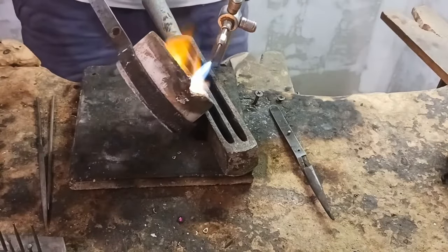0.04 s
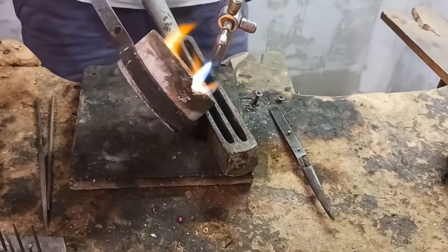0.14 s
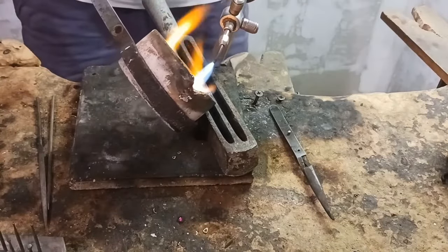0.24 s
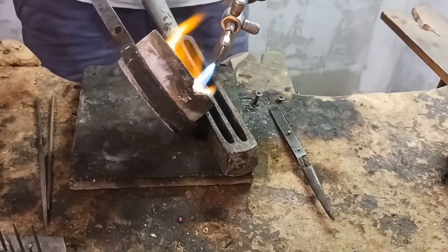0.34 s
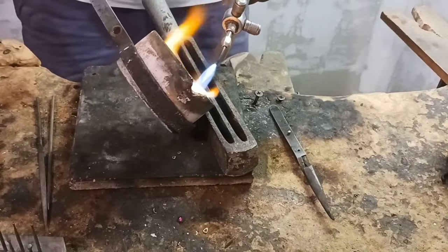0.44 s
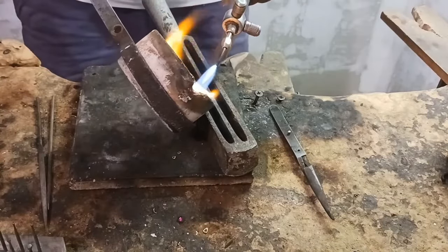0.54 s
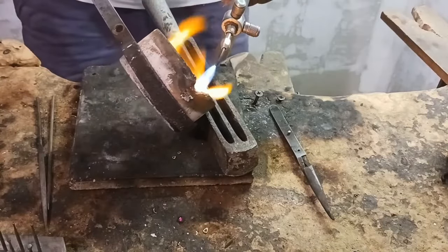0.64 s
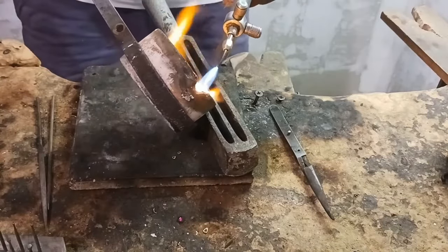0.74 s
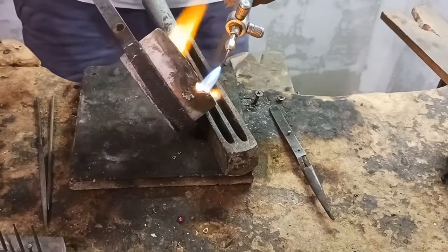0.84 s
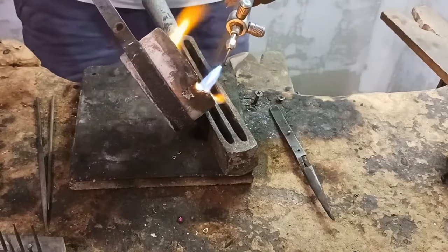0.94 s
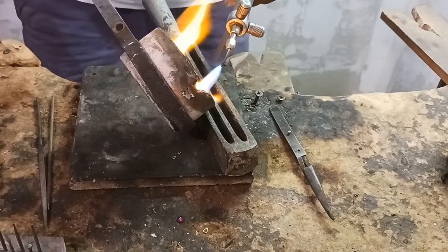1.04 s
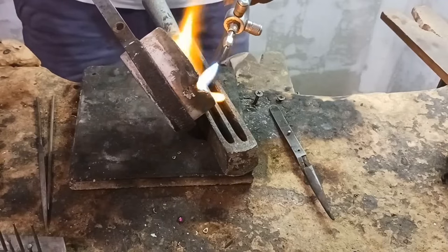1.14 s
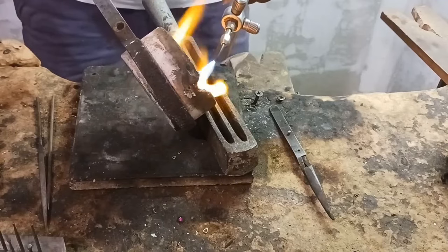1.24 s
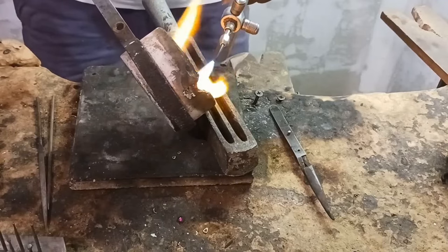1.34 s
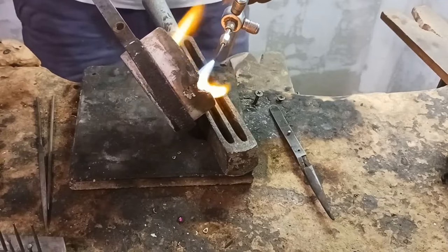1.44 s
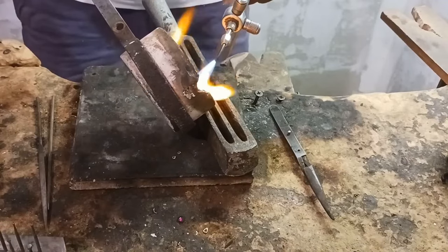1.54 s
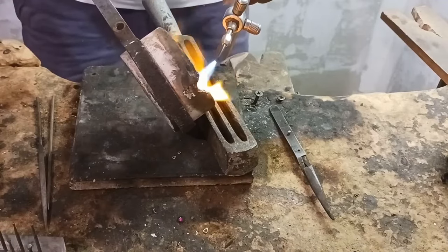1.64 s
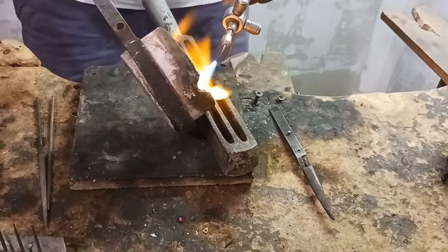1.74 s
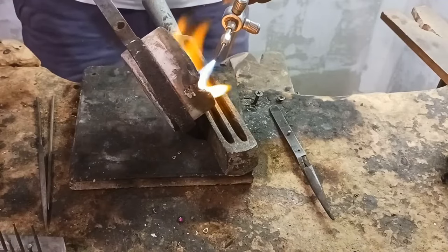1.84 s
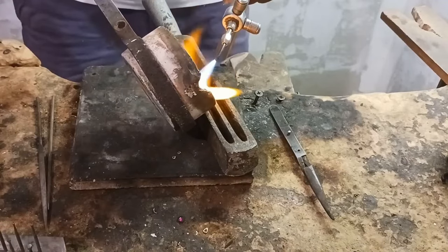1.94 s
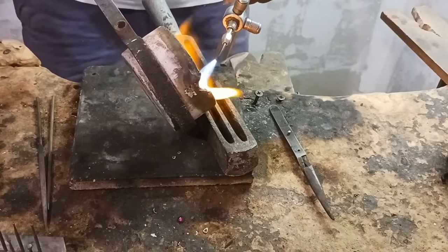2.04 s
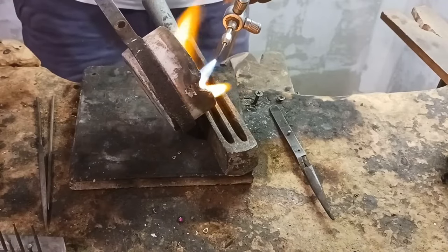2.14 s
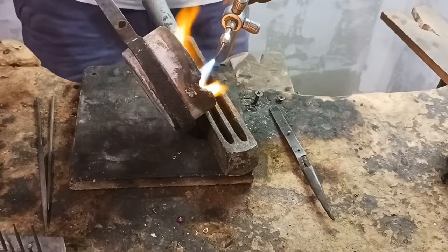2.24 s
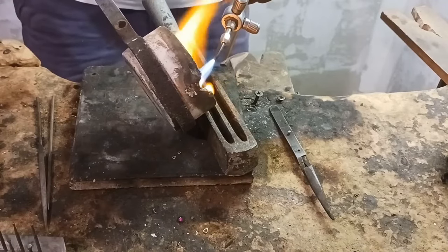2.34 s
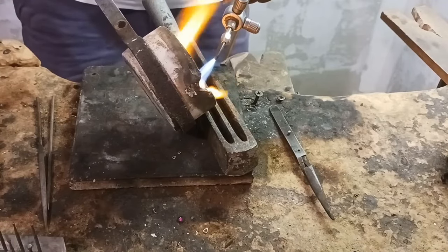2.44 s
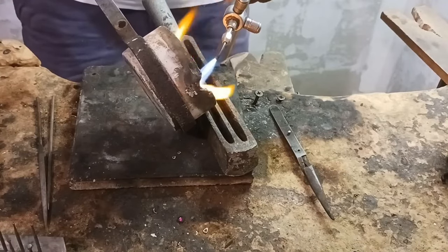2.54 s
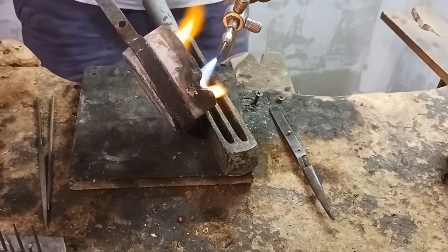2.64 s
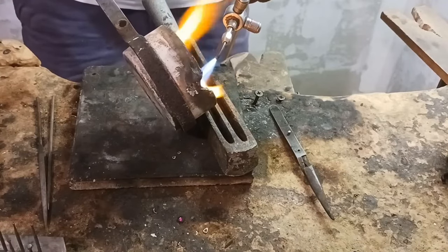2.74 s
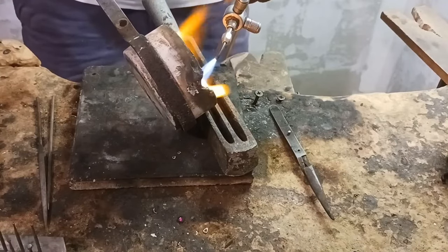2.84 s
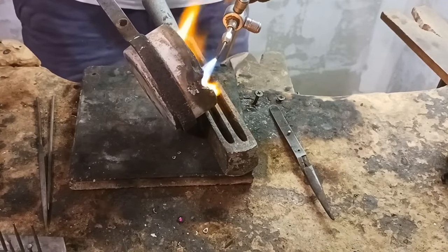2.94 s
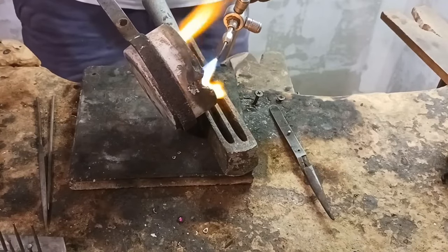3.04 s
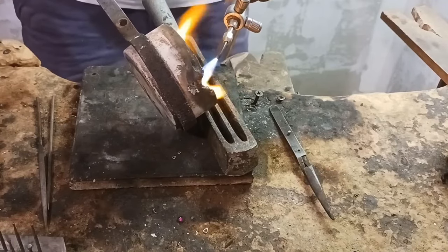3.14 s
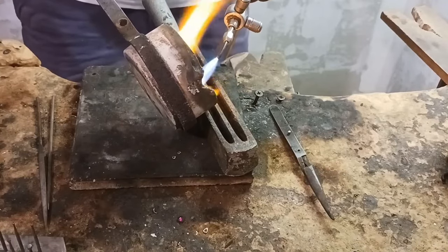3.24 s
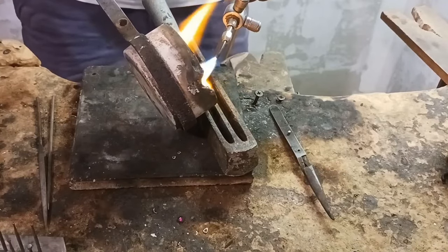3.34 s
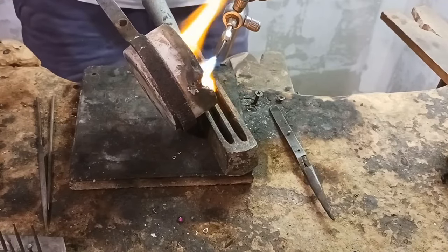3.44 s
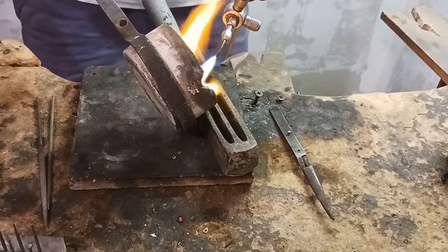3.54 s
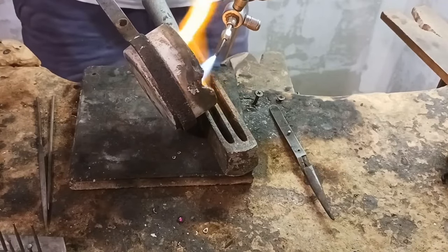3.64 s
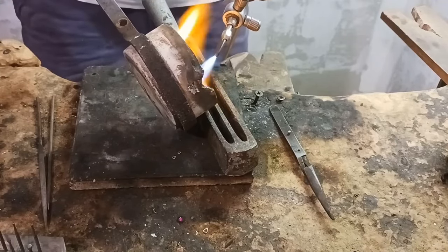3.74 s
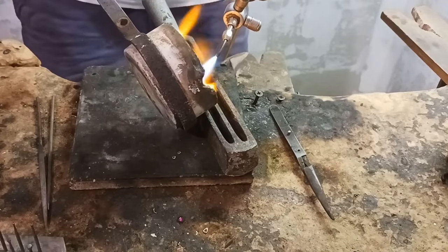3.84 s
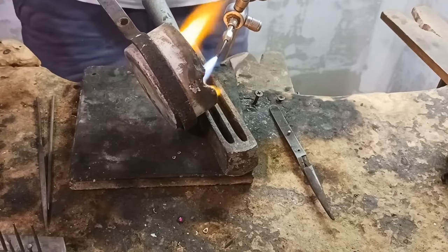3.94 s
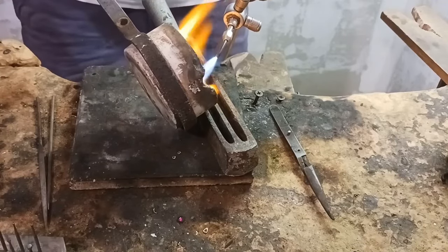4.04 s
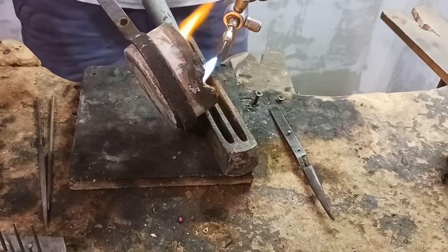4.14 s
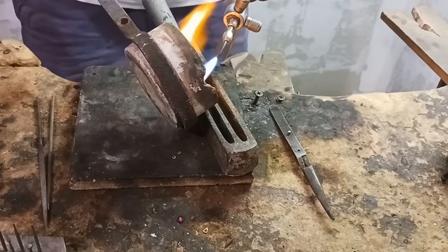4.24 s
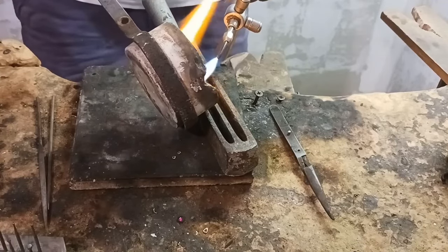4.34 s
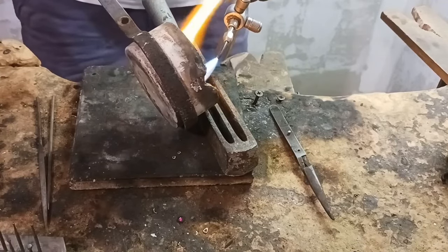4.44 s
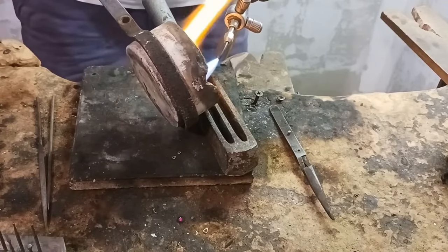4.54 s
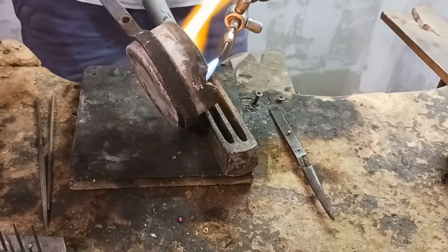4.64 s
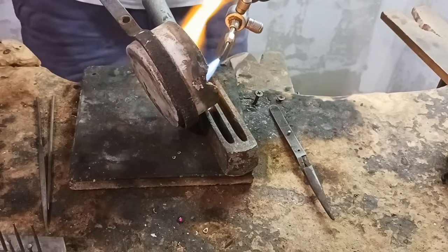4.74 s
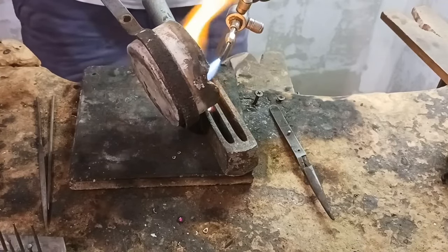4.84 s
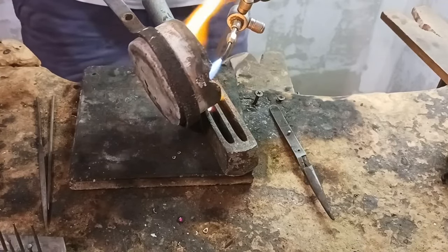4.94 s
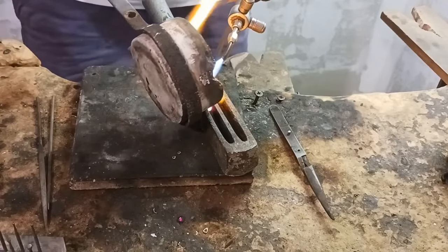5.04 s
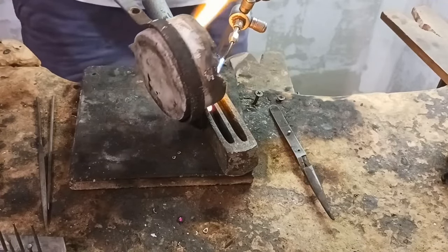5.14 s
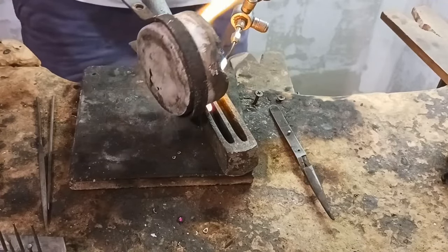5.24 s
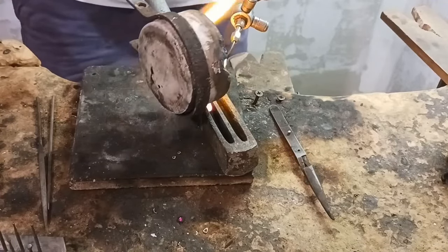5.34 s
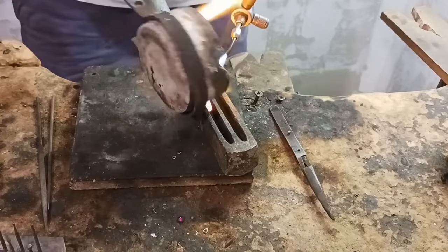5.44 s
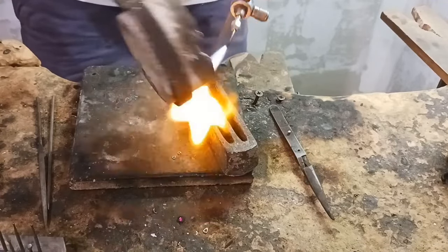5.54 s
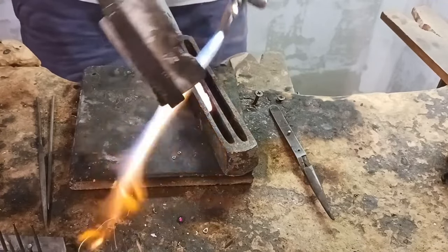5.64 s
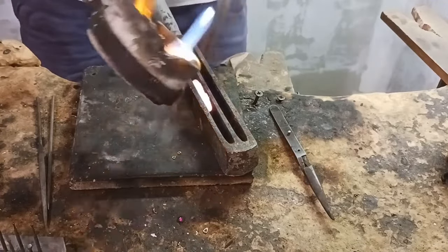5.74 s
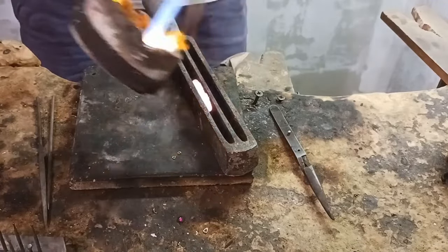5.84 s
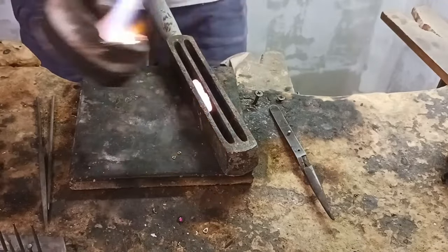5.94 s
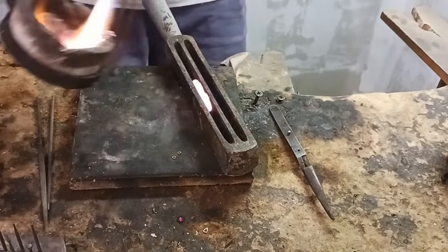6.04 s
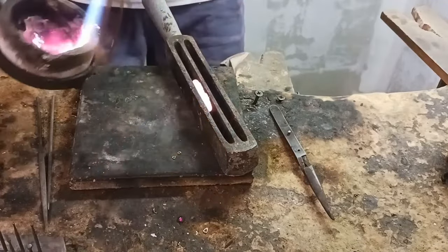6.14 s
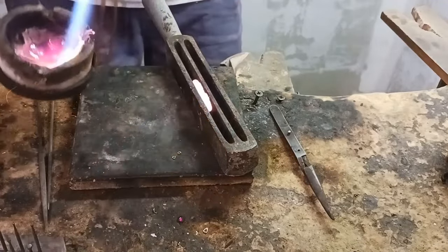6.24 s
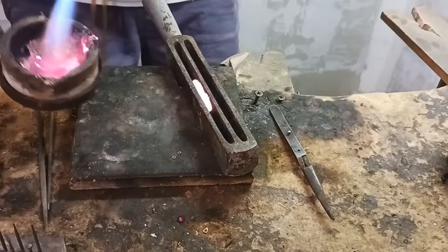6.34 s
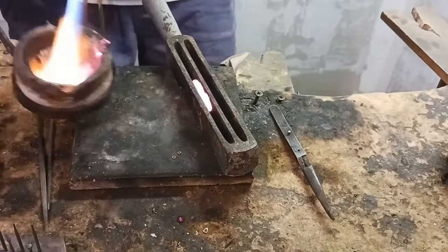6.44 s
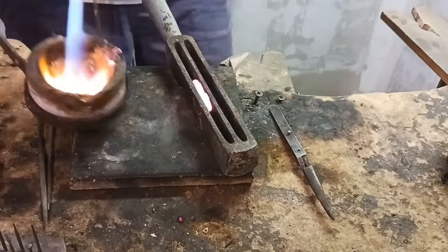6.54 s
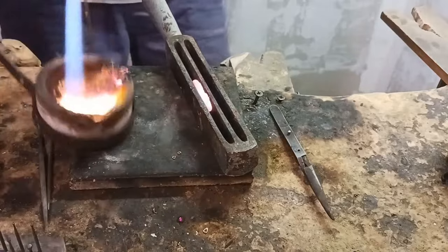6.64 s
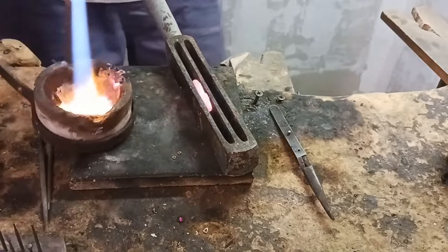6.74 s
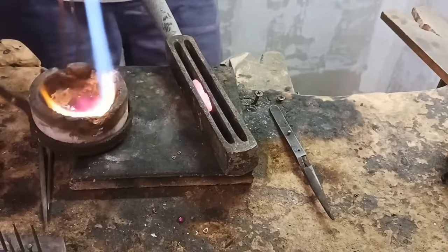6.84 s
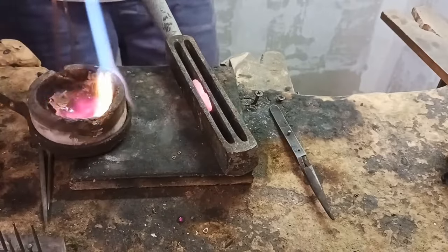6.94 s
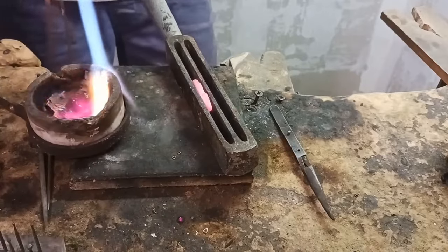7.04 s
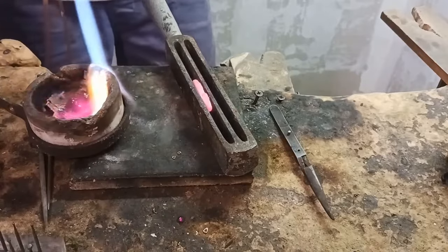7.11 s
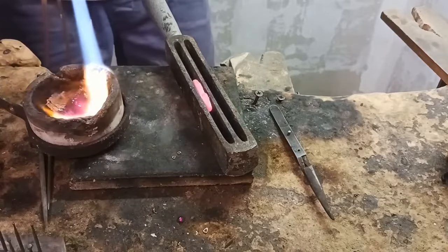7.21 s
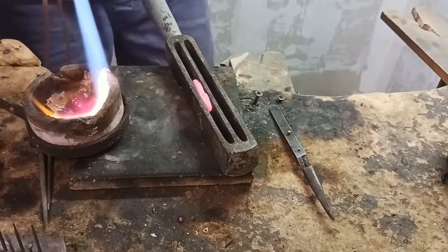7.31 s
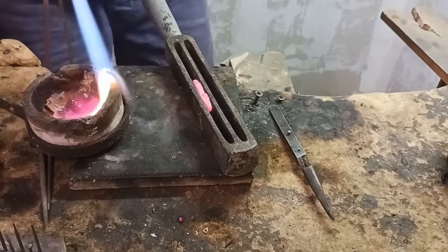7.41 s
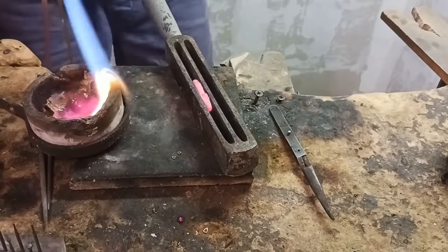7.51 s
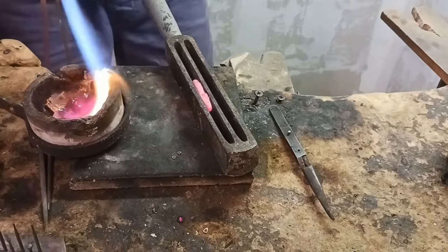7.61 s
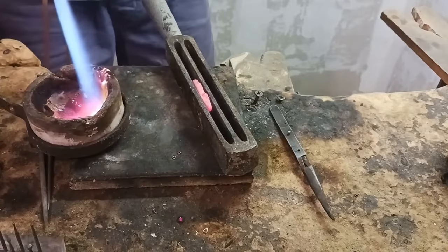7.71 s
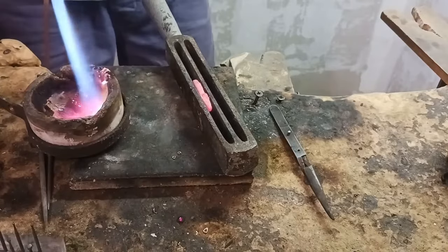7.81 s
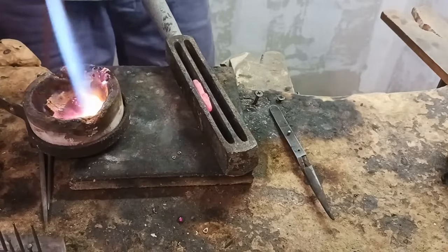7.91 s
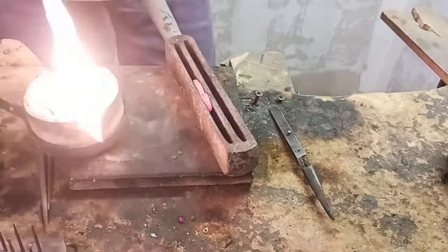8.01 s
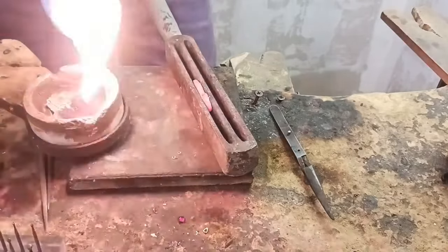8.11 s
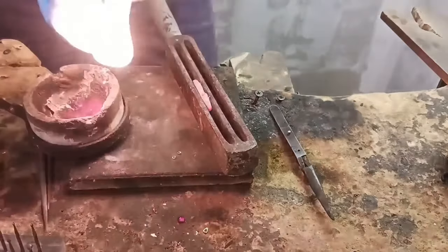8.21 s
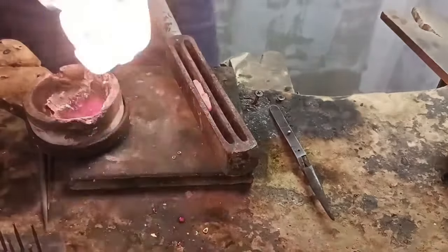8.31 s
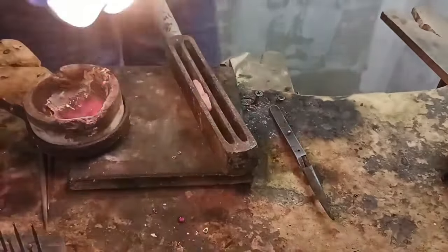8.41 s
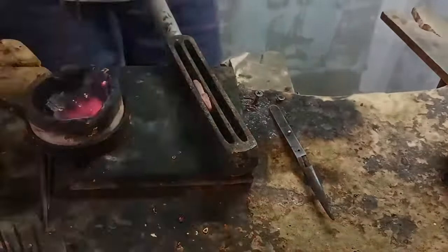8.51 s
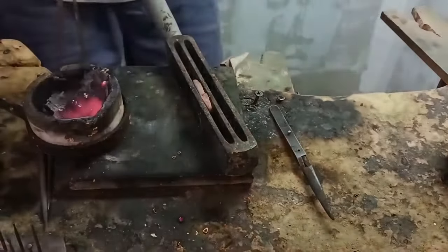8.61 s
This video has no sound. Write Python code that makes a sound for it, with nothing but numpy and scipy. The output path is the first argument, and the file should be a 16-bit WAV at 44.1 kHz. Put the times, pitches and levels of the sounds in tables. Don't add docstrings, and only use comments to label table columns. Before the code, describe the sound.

Close-up stereo sound of a turbulent torch jet, a dense hiss over a breathy roar with raspy, fizzing edges, heard from the start. It shifts in strength and colour with the hollow crucible. After a few faint bumps comes a solid clunk as the crucible is put on the bench, with a small settling knock. The jet soon stops sharply, with a short room tail, weak flame puffs and quiet hum.

```python
import sys
import numpy as np
from scipy import signal
from scipy.fft import rfft, irfft, next_fast_len
from scipy.io import wavfile
from scipy.ndimage import uniform_filter1d, map_coordinates

SR = 44100
rng = np.random.default_rng(int(sys.argv[2]) if len(sys.argv) > 2 else 0)


def amplitude_ratio(level_db):
    exponent = np.asarray(level_db, float) / 20
    return 10 ** exponent


def transcribe(u):
    v = np.clip(np.atleast_2d(u).T, -1, 1)
    q = np.round(v * 32767).astype(np.int16)
    wavfile.write(sys.argv[1], SR, q)


N = 382331

# (time [s], level [dB])
DEPTH = [(0, -0.5), (.7, -0.5), (1.6, 0), (2.4, 0.5), (2.75, 3.5), (3.3, 2.5), (3.9, 1.5), (4.3, -1),
         (4.8, 0.5), (5.3, -1), (5.65, -2.5), (5.8, -2), (6.2, -0.5), (6.8, 2.5), (7.3, -.5), (8.1, 0)]
HANDLED_S = (5.35, 8.5, .35)


def torch(mould, bench):
    # (frequency [Hz], density [dB per Hz])
    hiss = [(560, -39.5), (950, -16), (1350, -6.5), (1470, -8), (1740, -4), (1950, -4.5), (2120, -4),
            (2540, -2), (3500, -4.5), (4550, -51), (7700, -120)]
    roar = [(190, -37), (330, -14.5), (394, -17), (453, -3), (589, -4.5), (658, -1.5), (855, -2.5),
            (1100, -4), (1430, -10.5), (2420, -120)]
    rasp = [(1880, -32), (3200, -8), (3360, -25), (3500, -3.5), (3950, -1.5), (5380, -6.5), (6400, -11.5),
            (8320, -24), (14100, -120)]
    fizz = [(3500, -35.5), (6000, -5), (8750, 0.5), (9800, -2.5), (12700, -2), (14700, -4.5), (15300, -8),
            (15800, -9)]
    # (start [s], end [s], start over free jet [dB], end over free jet [dB], bite [dB])
    strikes = [(-.1, 0.836, 6, 6.2, 0.2), (0.83, 1.328, 4.5, 5.1, 1), (1.892, 2.46, 0.5, 1, -1.5),
               (2.46, 3.328, 2.5, 1.1, -0.4), (3.335, 3.457, 5, 1.5, 0), (3.56, 3.913, 6, 5.5, -1),
               (3.929, 4.24, 7, 5.8, -0.5), (4.426, 4.655, 6, 5.9, 0.5), (5.689, 5.788, 5, 9.2, 3.5),
               (5.788, 5.995, 9.5, 8.1, 1.5), (6, 6.116, 8.5, 8.7, -0.5), (6.118, 6.44, 9, 7.6, 1.6),
               (6.44, 6.71, 8.5, 4.2, 0), (6.705, 7.1, 8.5, 8.8, 0.8), (7.102, 7.525, 9, 2.8, 1),
               (7.804, 8.092, 7.5, 3, 0.6)]
    bite_shares = [-0.03, 0.18, 0.98, -0.011]
    # (time [s], left minus right [dB])
    swing = [(0.0, 5.5), (0.25, 6.5), (3.4, 8.5), (3.42, 7), (5.82, 7.5), (5.92, 2.5), (6.13, 6), (6.94, 5),
             (7.12, 0.5), (7.47, 5.5), (7.84, 3.5), (8.0, 5), (8.3, 4)]
    # (free level [dB], strike share [ratio], depth share [ratio], carried change [dB], air-cut change [dB])
    follows = [
        (-29.5, 0.53, 0.49, -1, -12.5),
        (-43.5, .1, 0.93, -1.6, -4.5),
        (-31, 0.87, 0.11, .5, -11.5),
        (-30, 0.98, 0.12, -1.5, -13),
    ]
    # (centred left minus right [dB], swing share [ratio], carried change [dB])
    leans = [
        (0.6, 0.47, -2),
        (-1.5, 0.06, -0.5),
        (-2, 0.73, -0.7),
        (1.1, 1.32, -2),
    ]
    # (frequency [Hz], width [Hz], level [dB])
    tilted = [(698, 116, 3), (1238, 55, 5), (1474, 115, 5.5), (1830, 28, 4.5), (1940, 23, 4.5),
              (1977, 27, 6.5), (2200, 80, 2.5), (2588, 183, 5), (2930, 120, 5), (3550, 71, 4),
              (3862, 72, 5.5), (4310, 60, 3.5), (4690, 94, 5)]
    # (frequency [Hz], width [Hz], level [dB])
    upright = [(733, 110, 2.3), (1254, 52, 5.1), (2050, 68, 3.1), (2690, 500, 0.71), (3700, 94, 2.5),
               (4240, 43, 2)]
    # (frequency [Hz], level [dB])
    shade = [(300, -4), (800, 1), (940, -4), (1150, -0.5), (1450, -4), (1580, 0), (3000, -1), (4200, -1),
             (5500, -0.7), (7000, 1)]
    edge_s = 0.013
    carry_start_s, carry_end_s = 5.44, 6.35
    air_cut_s, air_cut_length_s = 8.0, 0.03

    strike_db, bite_db = np.zeros((2, N))
    for start_s, end_s, first_db, last_db, edge_bite_db in strikes:
        hit = span(start_s, end_s, edge_s)
        strike_db += hit * slide(start_s, end_s, first_db, last_db)
        bite_db += hit * edge_bite_db
    depth_db, swing_db = curves(DEPTH)[0], curves(swing)[0]
    cut = slide(air_cut_s, air_cut_s + air_cut_length_s, 0, 1)
    turn_rad = np.pi / 2 * slide(carry_start_s, carry_end_s, 0, 1)
    aside = np.sin(turn_rad) ** 2
    surge = wobble(9)

    # colour, trim [dB], patches [dB], surge [dB], wash [dB], wash t60 [s]
    parts = [(hiss, -3.6, 1.3, .4, -3, .45), (roar, -1.2, 1.6, .3, -3, .45),
             (rasp, -7, 1.1, .6, 1.5, .4), (fizz, -9, 1.3, .7, 5, .35)]
    direct, total = np.zeros((2, 2, N))
    for part, follow, lean, sharp in zip(parts, follows, leans, bite_shares):
        colour, trim_db, patchy_db, surge_db, wash_db, t60_s = part
        free_db, strike_share, depth_share, moved_db, cut_db = follow
        centre_db, swing_share, side_moved_db = lean
        level_db = free_db + strike_share * strike_db + depth_share * depth_db
        level_db = level_db + moved_db * aside + cut_db * cut + sharp * bite_db
        side_db = centre_db + swing_share * swing_db + side_moved_db * aside
        flow = amplitude_ratio(level_db + valve_db() + trim_db + surge_db * surge)
        bursts = amplitude_ratio(0.98 * wobble(300))
        core, *scattered = rush(colour, patchy_db, channels=3) * bursts
        direct += panned(flow * core, side_db)
        total += panned(amplitude_ratio(wash_db) * lingering(flow, t60_s) * np.array(scattered), side_db)
    total += filtered(direct * np.cos(turn_rad), mould)
    total += filtered(direct * np.sin(turn_rad), bench)
    at_mould = filtered(total, hollow(tilted))
    at_bench = filtered(total, lambda hz: amplitude_ratio(along(shade, hz)) * hollow(upright)(hz))
    return (1 - aside) * at_mould + aside * at_bench


def valve_db():
    shut_s, t60_s = 8.1, 0.07
    return -60 * np.maximum(np.arange(N) / SR - shut_s, 0) / t60_s


def low_flame():
    # (frequency [Hz], density [dB per Hz])
    body_colour = [(65, -36), (110, -8), (129, -4), (167, -11.5), (231, -4.5), (400, -3.5), (520, -28),
                   (880, -120)]
    # (frequency [Hz], density [dB per Hz])
    puff_colour = [(50, -42), (110, -2), (300, -4), (600, -9), (1200, -27), (2200, -21), (4000, -39),
                   (8000, -120)]
    # (start [s], end [s], start level [dB], end level [dB])
    puffs = [
        (8.103, 8.346, -59, -57.5),
        (8.4, 8.53, -55, -57),
    ]

    steady = amplitude_ratio(1.1 * wobble(7)) * pair(body_colour, alike=.65, patchy_db=1.1)
    body_db = -66 + 0.75 * curves(DEPTH)[0] + 5 * span(*HANDLED_S)
    body = amplitude_ratio(body_db + .4 * np.maximum(valve_db(), -22) + 3.5) * steady
    lit = np.zeros(N)
    for start_s, end_s, first_db, last_db in puffs:
        lit += span(start_s, end_s, 0.077) * amplitude_ratio(slide(start_s, end_s, first_db, last_db))
    return body + lit * amplitude_ratio(1.5 * wobble(40)) * pair(puff_colour, alike=0.95, patchy_db=1.0)


def thuds():
    # (time [s], peak [dB], pitch [Hz], spread [octaves], t60 [s])
    contacts = [(.12, -49, 220, 0.57, .15), (.666, -46, 232, 0.34, .17), (5.62, -44, 170, 1.1, .3),
                (5.674, -40, 170, 0.99, .2), (6.35, -40, 170, 0.97, 0.24), (6.7209, -15, 620, 0.9, 0.027),
                (6.718, -24.5, 200, .7, 0.14), (6.73, -21, 490, 0.74, .13), (6.77, -30, 330, 0.79, 0.11),
                (7.137, -28.5, 240, 0.52, 0.098), (7.19, -37, 189, 0.55, .08),
                (7.019, -47, 150, 0.67, 0.12), (7.86, -44, 160, .9, 0.25)]
    # (frequency [Hz], level [dB])
    bench_modes = [(65, -15), (140, 1.5), (190, -1), (253, -1.5), (300, -3.5), (385, 1), (480, -4),
                   (590, 1), (700, 1.5), (850, -2.5), (1150, 3), (1600, 12)]
    width_hz, rise_share = 45, 0.1

    out = np.zeros((2, N + SR))
    t = np.arange(SR // 3) / SR
    f = np.fft.rfftfreq(2 * len(t), 1 / SR)
    for start_s, peak_db, pitch_hz, spread_oct, t60_s in contacts:
        rise = 1 - np.exp(-t / (rise_share * t60_s))
        shake = rng.standard_normal(len(t)) * amplitude_ratio(-60 * t / t60_s) * rise
        response = 0
        for k, (mode_hz, mode_db) in enumerate(bench_modes):
            off_pitch = np.log2(mode_hz / pitch_hz) / spread_oct
            gain = (-1) ** k * amplitude_ratio(mode_db - 2 * np.pi * off_pitch ** 2)
            loss = 1j * f * width_hz
            response = response + gain * loss / (mode_hz ** 2 - f * f + loss)
        ring = irfft(rfft(shake, 2 * len(t)) * response)[:len(t)]
        thud = panned(amplitude_ratio(peak_db) * ring / np.abs(ring).max(), -1.5)
        out[:, round(start_s * SR):][:, :len(t)] += thud
    return out[:, :N]


def workshop():
    # (frequency [Hz], density [dB per Hz])
    air_colour = [(12, -55), (20, -22), (34, -18), (55, -15), (81, -16), (113, -21), (138, -32),
                  (356, -25.5), (896, -20.5), (1120, -20), (16000, -40)]
    # (frequency [Hz], width [Hz], left minus right [dB])
    hums = [(54.5, 14, 7), (102.7, 9.8, 13.5)]
    calm_levels = [-68, -66.5]
    handled_rises = [5, 3.5]

    air_db = -60.5 + 1.26 * wobble(4.7)
    out = panned(amplitude_ratio(air_db) * pair(air_colour, alike=0.089, patchy_db=-1.5), 6.0)
    for (c, w, side_db), calm_db, busy_db in zip(hums, calm_levels, handled_rises):
        db = calm_db + busy_db * span(*HANDLED_S) + 2.8 * wobble(4.3)
        noise = rng.standard_normal((2, N))
        one, other = unit(filtered(noise, lambda f: (f * w / (c * c - f * f + 1j * f * w)) ** 2))
        hum = np.array([one, 0.3 * one + 0.4 * other])
        out = out + panned(amplitude_ratio(db - 1.0) * hum, side_db)
    return out


def place(near, lead_ms, wet_db):
    # (frequency [Hz], t60 [s])
    walls = [(200, 0.7), (2000, 0.32), (6000, 0.24), (15000, 0.11)]
    hz, t, z = signal.stft(rng.standard_normal((2, SR * 2 // 3)), SR, nperseg=256)
    t60_s = along(walls, hz)[:, None]
    tail = signal.istft(z * amplitude_ratio(-60 * t / t60_s) / np.sqrt(t60_s), SR, nperseg=256)[1]
    tail = np.pad(tail / np.linalg.norm(tail[0]), ((0, 0), (SR // 250, 0)))
    m = next_fast_len(N + SR)
    grid_hz = np.fft.rfftfreq(m, 1 / SR)

    def late(ms):
        return np.exp(-2j * np.pi * grid_hz * ms / 1000)

    echoes = np.array([1 + sum(gain * late(ms) for ms, gain in ear) for ear in near])
    return echoes * [late(0), late(lead_ms)] + amplitude_ratio(wet_db) * rfft(tail, m)


def hollow(modes):
    return lambda f: 1 + sum((amplitude_ratio(db) - 1) * 1j * f * w / (c * c - f * f + 1j * f * w) for c, w, db in modes)


def lingering(gain, t60_s):
    keep = amplitude_ratio(-120 / (t60_s * SR))
    return np.sqrt(signal.lfilter([1 - keep], [1, -keep], gain ** 2, zi=[keep * gain[0] ** 2])[0])


def rush(spectrum, patchy_db, channels=1):
    z = signal.stft(rng.standard_normal((channels, N + 512)), nperseg=512)[2]
    field = uniform_filter1d(rng.standard_normal(z.shape[1:]), size=5, axis=0)
    field = uniform_filter1d(field, size=10, axis=1)
    noise = signal.istft(z * amplitude_ratio(patchy_db * unit(field)), nperseg=512)[1][:, :N]
    return unit(filtered(noise, lambda hz: amplitude_ratio(along(spectrum, hz))))


def pair(spectrum, alike, patchy_db):
    mid, side = rush(spectrum, patchy_db, channels=2)
    turn = np.arccos(np.clip(alike, 0, 1)) / 2
    mid, side = np.cos(turn) * mid, np.sin(turn) * side
    return np.array([mid + side, mid - side])


def panned(x, db):
    return x * amplitude_ratio(np.array([db / 2, -db / 2]).reshape(2, -1))


def filtered(x, response):
    m = next_fast_len(N + SR)
    gain = response(np.fft.rfftfreq(m, 1 / SR)) if callable(response) else response
    return irfft(rfft(x, m) * gain, m)[..., :N]


def wobble(rate_hz):
    knots = rng.standard_normal(int(N * rate_hz / SR) + 4)
    return map_coordinates(knots, [np.arange(N) * rate_hz / SR])


def curves(rows):
    s, *cols = np.transpose(rows)
    return [np.interp(np.arange(N) / SR, s, c) for c in cols]


def span(start_s, end_s, edge_s):
    t = np.arange(N) / SR
    return np.clip(np.minimum(t - start_s, end_s - t) / edge_s + .5, 0, 1)


def slide(start_s, end_s, first, last):
    return np.interp(np.arange(N) / SR, [start_s, end_s], [first, last])


def along(points, hz):
    f, v = np.transpose(points)
    return np.interp(np.log(hz + 1), np.log(f + 1), v)


def unit(x):
    return x / np.sqrt(np.mean(x ** 2) + 1e-20)


def scene():
    # (delay [ms], gain [ratio])
    near_mould = [
        [(.55, 0.097), (1.05, 0.032), (2.0, 0.26), (2.58, 0.27)],
        [(.75, 0.036), (1.98, 0.06), (3.08, 0.18), (6.7, 0.059)],
    ]
    # (delay [ms], gain [ratio])
    near_bench = [
        [(.7, 0.054), (1.85, 0.18), (2.8, 0.24), (7.5, 0.54)],
        [(.42, 0.4), (.7, .2), (1.08, 0.16), (3.3, 0.16)],
    ]
    mould = place(near_mould, lead_ms=0.077, wet_db=-5.5)
    bench = place(near_bench, lead_ms=-0.031, wet_db=-3.5)
    return torch(mould, bench) + low_flame() + thuds() + workshop()


def thinned(x, floor_db, ragged_hz, ragged_share):
    # (frequency [Hz], threshold under the neighbours [dB])
    weak = [(380, -24), (500, -9), (900, -6), (1600, -6.5), (3000, -8), (8000, -9), (13000, -8.5),
            (15500, -7)]
    # (frequency [Hz], threshold under the loudest band [dB])
    masked = [(4300, -29), (4900, -14.5), (6000, -12.5), (7000, -16.5), (7800, -40)]
    top_hz = 15730
    mid_side = np.array([x[0] + x[1], x[0] - x[1]]) / 2
    hz, t, z = signal.stft(mid_side, SR, nperseg=2048, noverlap=1024, window="cosine")
    power = np.abs(z) ** 2
    cell = uniform_filter1d(power, size=4, axis=1)
    around = uniform_filter1d(power, size=48, axis=1)
    around = np.abs(uniform_filter1d(around, size=3, axis=2))
    loudest = around[:, (hz > 1800) & (hz < 3200)].mean(axis=1, keepdims=True)
    weak_limit = amplitude_ratio(2 * along(weak, hz))[:, None] * around
    masked_limit = amplitude_ratio(2 * along(masked, hz))[:, None] * loudest
    needed = np.maximum(weak_limit, masked_limit)
    ragged = rng.integers(1, 3, len(t)) * (rng.random(len(t)) < ragged_share)
    edge_hz = top_hz - ragged_hz * ragged
    kept = np.where(cell > needed, 1, amplitude_ratio(floor_db)) * (hz[:, None] < edge_hz)
    mid, side = signal.istft(z * kept, SR, nperseg=2048, noverlap=1024, window="cosine")[1][:, :N]
    return np.array([mid + side, mid - side])


def top_cut(x):
    return signal.sosfilt(signal.butter(12, 15730, fs=SR, output="sos"), x)


def record(dry):
    mix = thinned(dry, floor_db=-20, ragged_hz=340, ragged_share=.15)
    return top_cut(mix)


dry = scene()
out = record(dry)
transcribe(out)
```